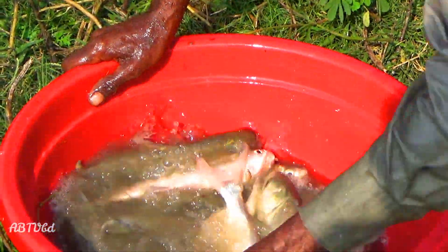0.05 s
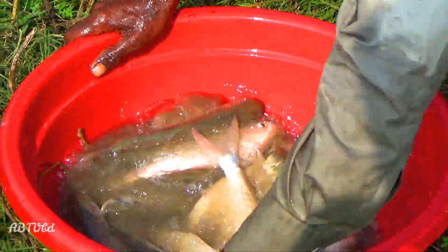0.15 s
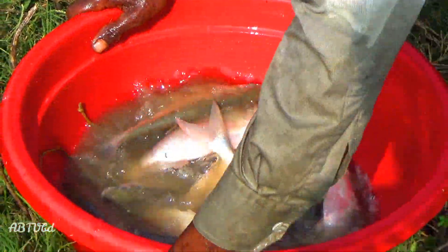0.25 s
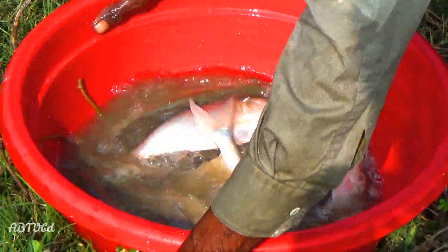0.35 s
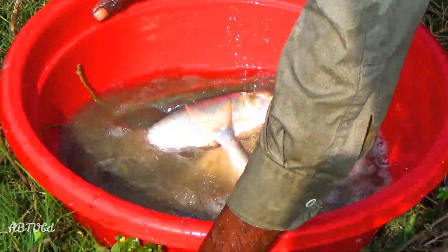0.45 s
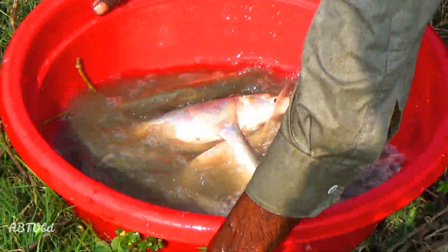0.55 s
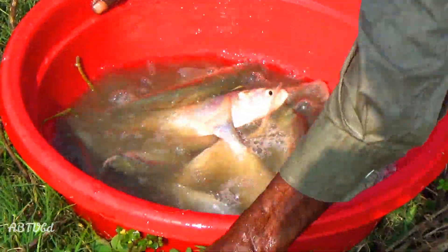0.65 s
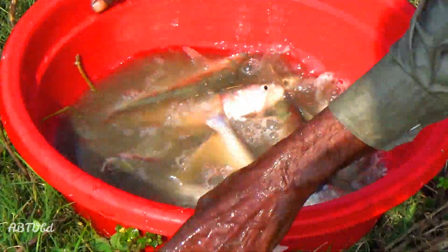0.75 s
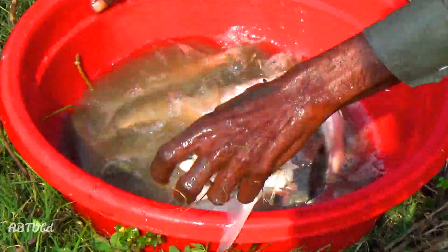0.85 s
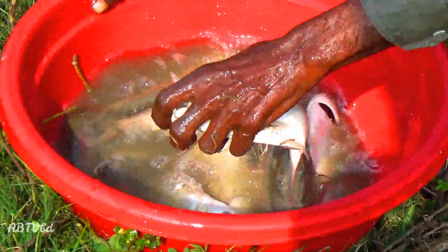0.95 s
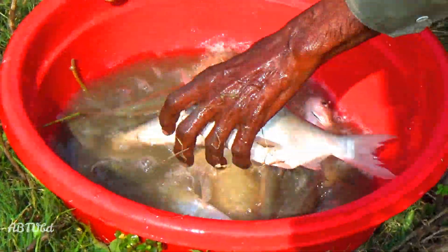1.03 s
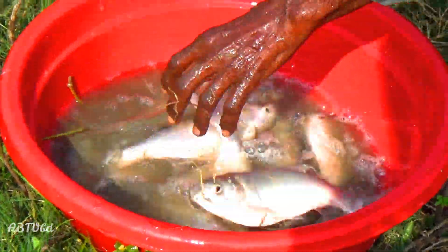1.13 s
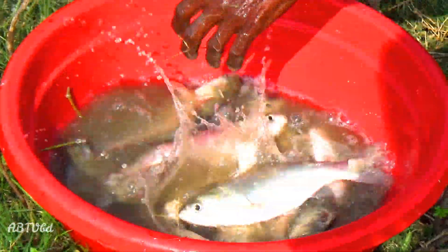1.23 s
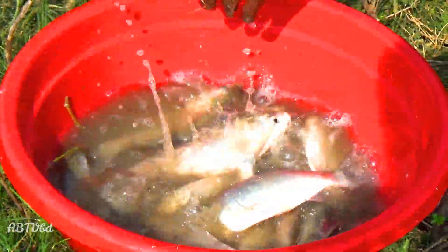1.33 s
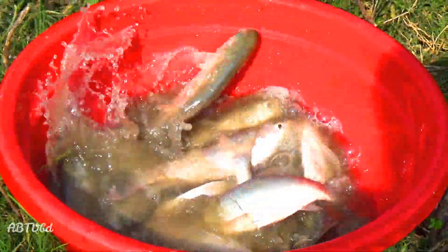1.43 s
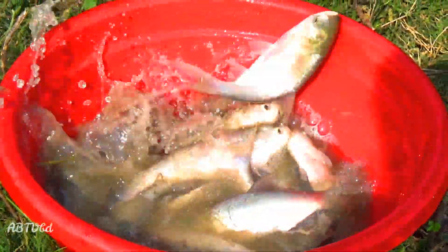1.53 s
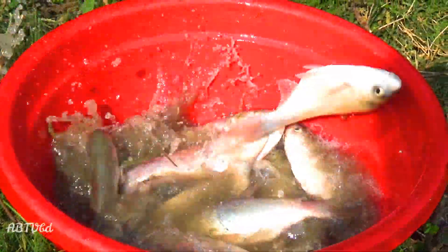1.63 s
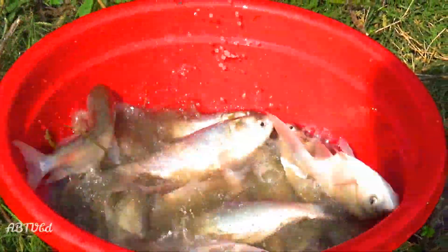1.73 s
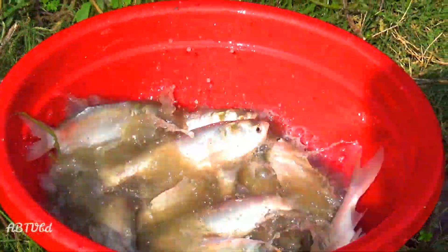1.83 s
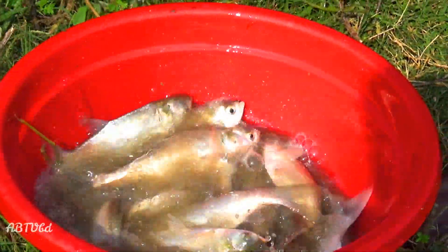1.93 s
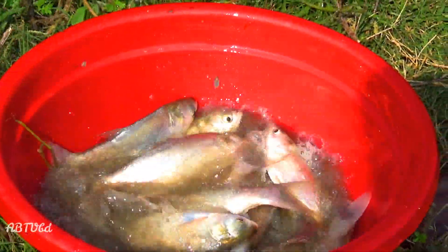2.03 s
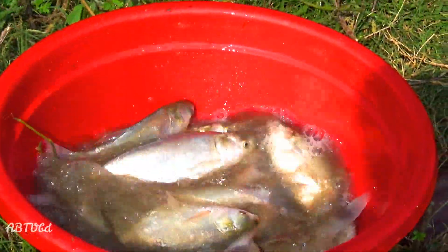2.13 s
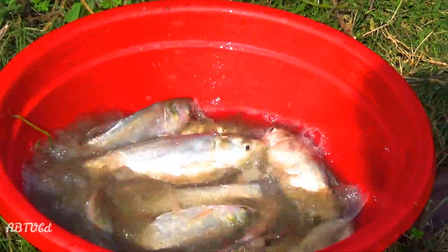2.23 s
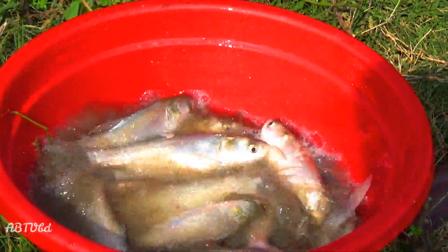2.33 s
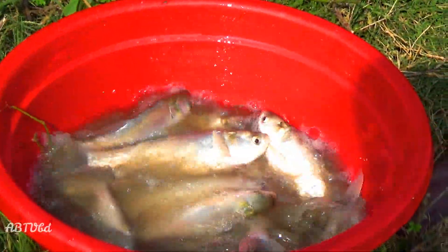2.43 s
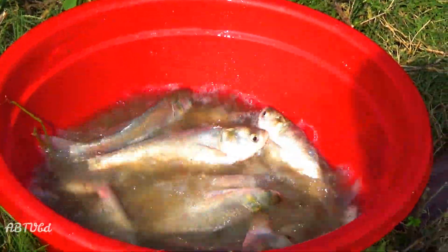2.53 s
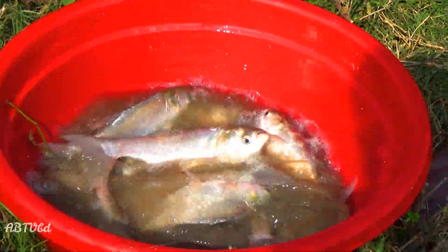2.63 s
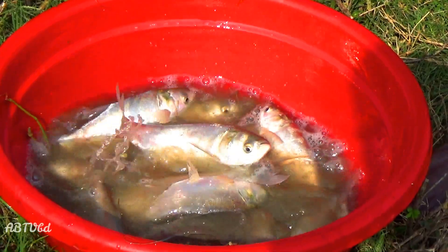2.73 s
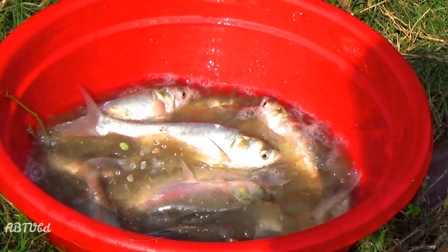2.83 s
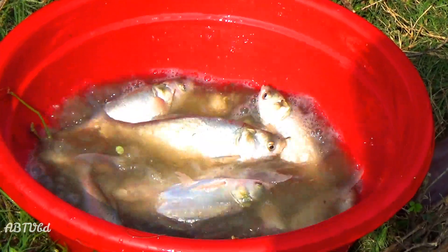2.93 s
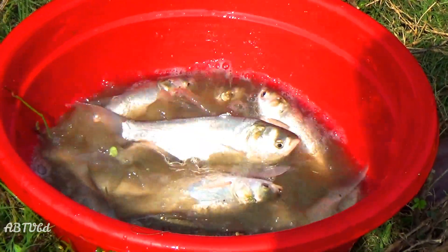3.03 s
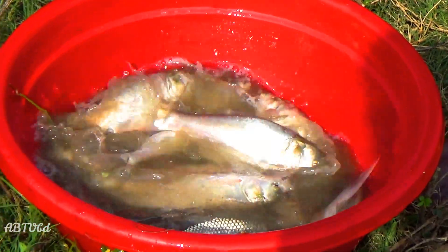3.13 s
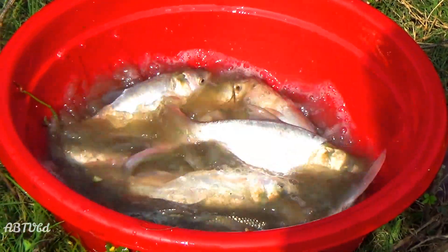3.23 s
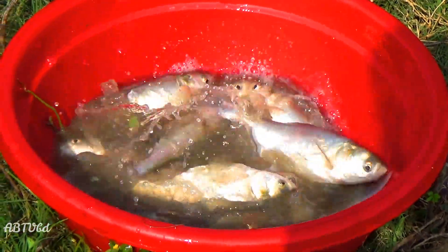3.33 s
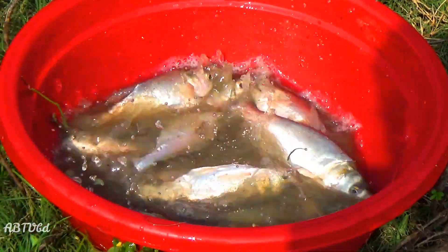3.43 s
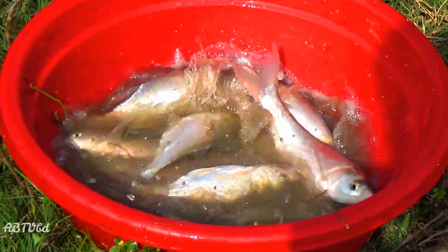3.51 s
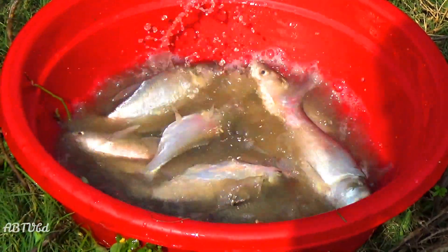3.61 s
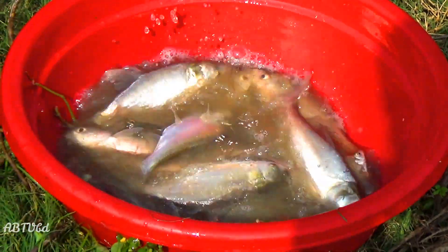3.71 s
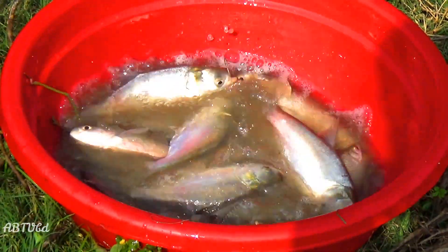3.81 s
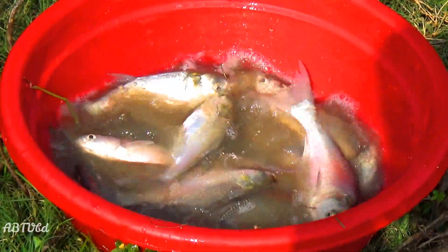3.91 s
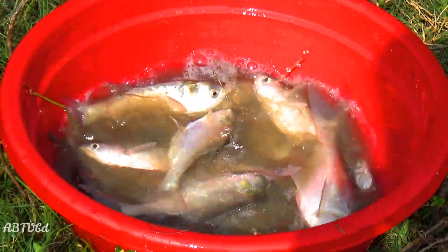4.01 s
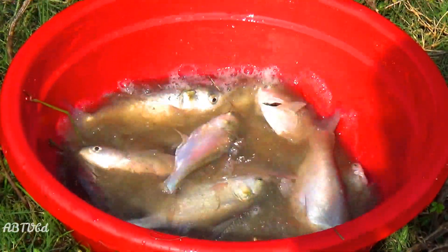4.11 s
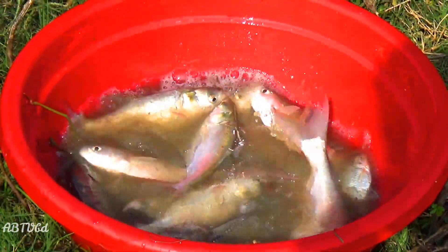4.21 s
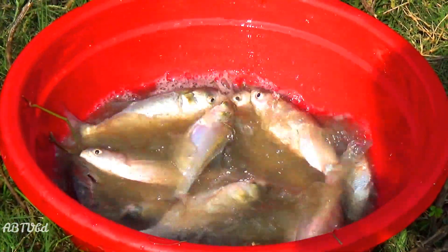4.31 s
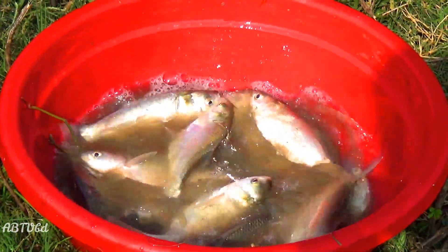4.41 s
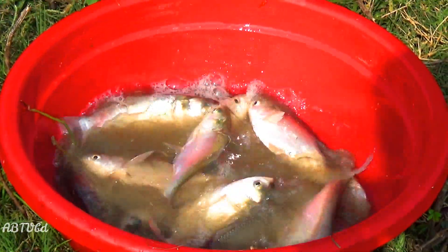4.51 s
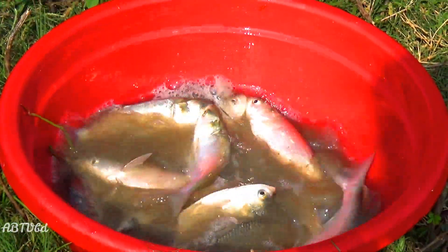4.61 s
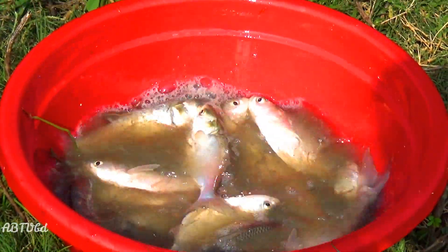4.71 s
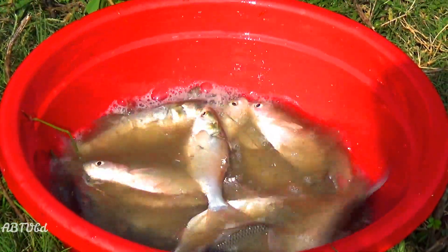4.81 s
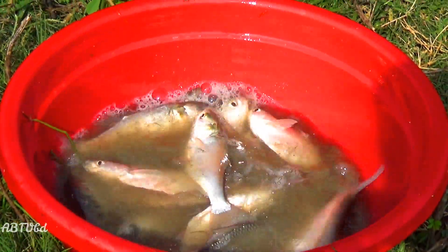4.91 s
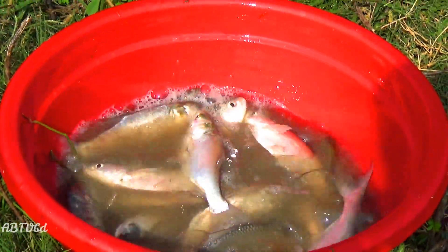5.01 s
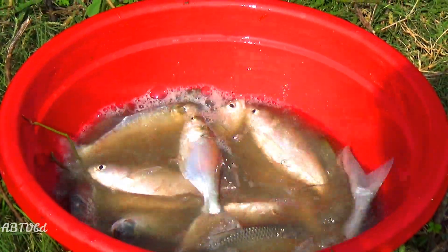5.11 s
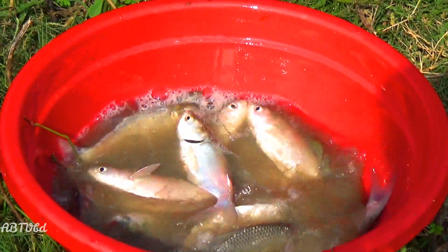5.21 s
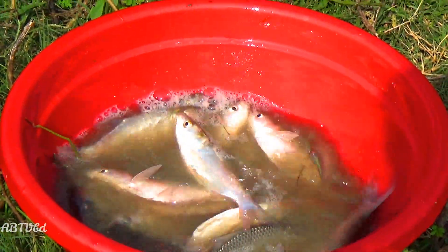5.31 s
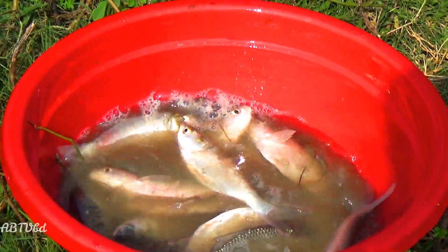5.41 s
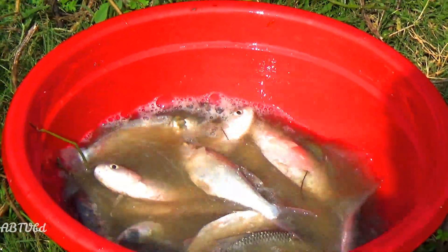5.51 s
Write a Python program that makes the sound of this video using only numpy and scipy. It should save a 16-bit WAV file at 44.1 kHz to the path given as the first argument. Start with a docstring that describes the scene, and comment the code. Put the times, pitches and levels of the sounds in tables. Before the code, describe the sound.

Close stereo pickup of fish in a shallow plastic basin outdoors. A hand stirs the water with soft fizz and small plops, then a hard slap just after one second leads into a violent thrashing burst of spray and slosh until about 1.9 seconds. Sparse drops tick afterwards, then shorter flurries of slaps and crackling droplets return. Low wind rumbles and thumps on the microphone over a faint open-air hush.

```python
"""Wind rumbles and thumps on a stereo microphone over a soft outdoor hush: shaped noise and short pulses.
In a shallow plastic basin, stirred by a hand for the first second, fish thrash: spray patters, foam
fizzes and water sloshes (noise and random bursts), trapped air rings and two low thumps sound (short sines).
Flung drops and tail slaps add noise cracks and resonant plops; the basin wall smears all the water."""
import sys
import numpy as np
from scipy import signal
from scipy.fft import rfft, irfft
from scipy.io import wavfile
from scipy.ndimage import uniform_filter1d

SR = 44100
rng = np.random.default_rng(int(sys.argv[2]) if len(sys.argv) > 2 else 0)


def generate_wav(sig):
    """Save sig (samples, or channels by samples) to the path in sys.argv[1] as 16-bit PCM at SR."""
    pcm = np.round(np.clip(np.atleast_2d(sig).T, -1, 1) * 32767).astype(np.int16)
    wavfile.write(sys.argv[1], SR, pcm)


def voltage_ratio(level):
    """Linear amplitude factor for a level in decibels (scalar or array-like)."""
    return 10 ** (np.asarray(level, float) / 20)


N = 244965
TIME = np.arange(N) / SR
LEFT_RIGHT = np.array([[1.], [-1.]])


def colour(x, points, turn=1):
    """Shapes x to a (Hz, dB) spectrum at rms 1; turn rotates the phase."""
    hz, db = np.transpose(points)
    f = np.fft.rfftfreq(x.shape[-1], 1 / SR) + 1  # + 1 avoids log 0
    gain = voltage_ratio(np.interp(np.log(f), np.log(hz), db))
    y = irfft(rfft(x) * turn * gain, x.shape[-1])
    return y / np.sqrt(np.mean(y ** 2))


def band(x, lo_hz, hi_hz):
    """Butterworth band-pass."""
    return signal.sosfilt(signal.butter(N=2, Wn=[lo_hz, hi_hz], btype="band", fs=SR, output="sos"), x)


def curves(table):
    """Table columns interpolated at every sample."""
    s, *columns = np.transpose(table)
    return [np.interp(TIME, s, c) for c in columns]


def walk(rate_hz):
    """Random levels, one per 1 / rate_hz, joined by straight slews; spread near 1.3."""
    k = int(SR / rate_hz)
    held = np.repeat(rng.standard_normal(N // k + 1), k)
    return 1.57 * uniform_filter1d(held, k)[:N]


def place(sounds, start_s, pan_db):
    """Adds each row of sounds at its start, left over right by pan_db."""
    out = np.zeros((2, N + sounds.shape[1]))
    for sound, s, db in zip(sounds, start_s, pan_db):
        i = max(int(s * SR), 0)
        out[:, i:i + len(sound)] += sound * voltage_ratio(LEFT_RIGHT * db / 2)
    return out[:, :N]


# Wind level before buffeting. Each row: time in seconds, rumble in dB, upper rumble relative to it in dB.
WIND_LEVELS = [(0.0, -32, -4), (0.11, -32.5, 1), (0.61, -26.5, -16), (1.09, -32, -6.5), (1.76, -27, -9.5),
               (2.3, -31, -5), (2.49, -27, -10.5), (2.56, -36.5, -6), (2.72, -39, -11), (2.9, -41.5, -18),
               (3.08, -33.5, -13), (3.3, -26.5, -13.5), (3.66, -40, -17), (3.86, -35.5, -16),
               (4.27, -44, -25), (4.58, -41, -3.5), (4.98, -36, -28), (5.55, -41, -33)]
# Rumble spectrum common to both capsules. Each row: frequency in Hz, relative density in dB per Hz.
RUMBLE_SPECTRUM = [(12, -46), (20, -14), (59, 0), (102, -1.5), (137, -6), (256, -21), (420, -36),
                   (550, -41), (920, -120)]
# Rumble spectrum of the left-right difference. Each row: frequency in Hz, relative density in dB per Hz.
RUMBLE_SIDE_SPECTRUM = [(12, -44), (20, -19), (65, -3.5), (141, -2), (394, -23), (905, -36.5), (1400, -42),
                        (3300, -120)]


def wind():
    """Turbulence on two close capsules: shared bass, plus a side part partly a quarter cycle behind it."""
    low_db, upper_db = curves(WIND_LEVELS)
    shared, own = rng.standard_normal((2, N))
    lagging = colour(shared, RUMBLE_SIDE_SPECTRUM, turn=-1j)
    side = 0.77 * lagging + 0.46 * colour(own, RUMBLE_SIDE_SPECTRUM)
    pair = colour(shared, RUMBLE_SPECTRUM) + LEFT_RIGHT * voltage_ratio(-5.5) * side
    low = signal.sosfilt(signal.butter(N=1, Wn=120, fs=SR, output="sos"), pair)
    # eddies buffet the capsules, and shake the upper rumble most
    buffet = np.exp(0.5 * np.tanh(walk(30)))
    upper = voltage_ratio(upper_db + 6.0 + 1.8 * buffet) * (pair - low)
    rumble = voltage_ratio(low_db + 1.77 * buffet) * (low + upper)
    return rumble + eddy_thumps()


# Thumping eddies. Each row: centre in seconds, peak in dB.
WIND_EDDIES = [(0.057, -17), (0.072, -18), (0.17, -17.5), (0.848, -21.5), (0.887, -19), (1.789, -15),
               (1.963, -19.5), (2.114, -19.5), (2.29, -22), (2.428, -24.5)]


def eddy_thumps():
    """Each passing eddy is one pressure pulse with a dip on either side."""
    width_s = 0.0023
    thumps = np.zeros(N)
    for s, db in WIND_EDDIES:
        age = ((TIME - s) / width_s) ** 2
        thumps += voltage_ratio(db) * (1 - 2 * age) * np.exp(-age)
    return thumps


# Hush spectrum common to both sides. Each row: frequency in Hz, relative density in dB per Hz.
HUSH_SPECTRUM = [(120, -36), (200, 5), (269, -3), (441, -5), (502, -8.5), (905, -6), (1090, -13),
                 (1630, -18), (2270, -20), (3670, -26), (9730, -24), (15100, -31), (16300, -36)]
# Hush spectrum of the left-right difference. Each row: frequency in Hz, relative density in dB per Hz.
HUSH_SIDE_SPECTRUM = [(120, -32), (200, -4), (2000, -12), (3470, -23), (4250, -23), (7950, -24),
                      (11900, -38), (16300, -73)]


def hush():
    """Far outdoor hush: steady noise, with an independent side part that widens it."""
    mid_db, side_db = -50, -56.5
    mid, side = rng.standard_normal((2, N))
    wide = LEFT_RIGHT * voltage_ratio(side_db) * colour(side, HUSH_SIDE_SPECTRUM)
    return voltage_ratio(mid_db) * colour(mid, HUSH_SPECTRUM) + wide


# Stirring between splashes. Each row: time in seconds, spray in dB, slosh in dB.
STIR_LEVELS = [(0.0, -42, -44.5), (0.22, -41, -52), (0.5, -50, -58.5), (0.6, -42.5, -59),
               (0.64, -46.5, -58), (0.72, -46.5, -51.5), (0.8, -51, -55), (0.83, -53.5, -55),
               (0.92, -56, -60.5), (1.14, -53, -50.5), (1.34, -40, -47.5), (1.46, -34.5, -30),
               (1.75, -30, -37), (1.86, -31, -38), (1.89, -37, -41.5), (1.96, -42.5, -49), (2.37, -49, -54),
               (2.79, -50, -56), (2.92, -41.5, -54.5), (3.06, -40, -53.5), (3.35, -43, -51),
               (3.5, -35.5, -47), (3.74, -48.5, -54.5), (4.11, -45, -53.5), (4.33, -41, -53),
               (4.65, -44.5, -55.5), (4.74, -45, -49.5), (5.14, -49.5, -52), (5.38, -49, -55),
               (5.55, -38, -49.5)]
# Splashes, brief surges of the stirring. Each row: peak time in seconds, spray in dB, slosh in dB.
SPLASH_SURGES = [(0.058, -35, -44), (0.228, -46, -60), (0.33, -38.5, -52), (1.099, -49.5, -43.5),
                 (1.195, -26.5, -33), (1.445, -25, -35), (1.48, -28, -30.5), (1.508, -21.5, -27),
                 (1.562, -22, -24), (1.624, -23.5, -32), (1.67, -36, -45), (1.71, -30.5, -32.5),
                 (1.799, -28, -25), (1.868, -46, -43), (3.21, -54, -43.5), (3.306, -36, -43),
                 (3.381, -30.5, -39.5), (3.44, -37, -37.5), (3.516, -40, -42), (3.78, -46, -45),
                 (3.85, -37.5, -50), (4.056, -31.5, -55), (4.18, -30, -50), (4.68, -44, -47),
                 (5.05, -41, -53), (5.21, -36.5, -45), (5.512, -39, -49)]


def stirring():
    """Spray and slosh level in dB: steady stirring plus, in power, splashes that rise faster than they fall."""
    rise_db_per_s, fall_db_per_s = 486, 314
    s, *peaks_db = np.transpose(SPLASH_SURGES)[:, :, None]
    coarse_s = TIME[::64]
    late_s = coarse_s - s
    slope_db = np.where(late_s < 0, rise_db_per_s * late_s, -fall_db_per_s * late_s)
    levels_db = []
    for steady_db, peak_db in zip(curves(STIR_LEVELS), peaks_db):
        power = np.sum(voltage_ratio(peak_db + slope_db) ** 2, axis=0)
        surge = np.interp(TIME, coarse_s, power)
        levels_db.append(10 * np.log10(voltage_ratio(steady_db) ** 2 + surge))
    return levels_db


def patter(per_s, spread_db, tail_ms):
    """Droplets at random moments, a few far bigger than the rest, each a decaying noise burst."""
    hits = rng.random(N) < per_s / SR
    size = hits * voltage_ratio(spread_db * np.minimum(rng.exponential(size=N), 3.3))
    bursts = signal.lfilter([1], [1, -np.exp(-1000 / SR / tail_ms)], size)
    return bursts * rng.standard_normal(N)


# Spray spectrum. Each row: frequency in Hz, relative density in dB per Hz.
SPRAY_SPECTRUM = [(1470, -36), (2500, 0.5), (3140, -7.5), (4000, -0.5), (4830, 1.5), (5740, -2.5),
                  (9190, 1), (11400, -5), (14700, -25), (16300, -61)]
# Slosh spectrum. Each row: frequency in Hz, relative density in dB per Hz.
SLOSH_SPECTRUM = [(260, -4.5), (450, -1.5), (523, -7), (705, 0.5), (834, -8), (1970, 1), (3650, -4),
                  (4200, -42), (9240, -120)]


def churn(spray_db, slosh_db):
    """Spray patters and foam fizzes in the treble, water sloshes below; patter and slosh clump together."""
    hand_out_s = 1
    clumps = 1.3 * np.tanh(walk(45))
    # while a hand stirs the water, fizz gains and patter loses
    hand_db = np.where(TIME < hand_out_s, 3.0, 0)
    # fine drops tick high, fat ones lower
    fine = band(patter(600, 4.24, 1.0), 5400, 22000)
    fat = band(patter(300, 8.4, 0.35), 1900, 8400)
    spray = colour(fine + 0.55 * fat, SPRAY_SPECTRUM) * voltage_ratio(-5.0 - hand_db + 3.5 * clumps)
    foam = colour(band(rng.standard_normal(N), 7500, 22000), SPRAY_SPECTRUM)
    fizz = foam * voltage_ratio(-9.5 + hand_db + 2.0 * walk(70))
    lumpy = colour(patter(600, 4.1, 3.6), SLOSH_SPECTRUM)
    smooth = colour(rng.standard_normal(N), SLOSH_SPECTRUM)
    slosh = voltage_ratio(-4.5) * lumpy + voltage_ratio(-12.0) * smooth
    return voltage_ratio(spray_db) * (spray + fizz) + voltage_ratio(slosh_db + 3.43 * clumps) * slosh


def ring_out(db, hz, ms, rise):
    """A sine that swells fast, climbs in pitch, as an air pocket does nearing the surface, and dies."""
    t = np.arange(1280) / SR
    age = t * 1000 / ms
    shape = (1 - np.exp(-age / 0.02)) * np.exp(-age ** 2.6 / 1.76)
    return voltage_ratio(db) * shape * np.sin(2 * np.pi * hz * t * (1 + rise * (age - 1) / 2))


# Clear air pockets, and two short low thumps near 1.71 and 1.79 s.
# Each row: start in seconds, level in dB, pitch at half length in Hz, length in ms.
POCKETS_AND_THUMPS = [(0.008, -38, 1900, 3.4), (0.035, -40, 1290, 7.9), (0.069, -30.5, 846, 4.4),
                      (0.123, -39, 1480, 5.9), (0.135, -33, 5400, 2.5), (0.153, -22, 1394, 8.9),
                      (0.226, -35, 990, 8.9), (0.228, -30, 2210, 5.2), (0.358, -31.5, 970, 2.3),
                      (0.388, -39, 610, 3.5), (0.69, -42, 820, 3.9), (0.805, -31.5, 1350, 1.8),
                      (1.097, -36.5, 750, 11), (1.244, -37.5, 810, 8.6), (1.442, -29.5, 795, 6.4),
                      (1.479, -26.5, 1186, 12), (1.48, -19.5, 688, 8.2), (1.499, -24, 1890, 3.7),
                      (1.516, -24, 705, 4.7), (1.552, -24, 1106, 9.1), (1.668, -28.5, 2100, 7.7),
                      (1.699, -34, 1960, 12), (1.707, -21, 380, 4.2), (1.728, -26, 760, 3.4),
                      (1.784, -26, 865, 2.9), (1.79, -22, 287, 3.7), (1.812, -27.5, 1283, 8.4),
                      (1.904, -42, 2050, 3), (1.973, -40, 1400, 3.3), (1.985, -36, 2900, 2.8),
                      (1.991, -41, 1830, 6), (2.043, -39, 1300, 3.1), (2.085, -40, 2780, 5.4),
                      (2.138, -35, 1930, 2.3), (2.142, -33, 2350, 5.8), (2.437, -41.5, 2600, 2.6),
                      (2.519, -42, 810, 5.4), (2.752, -37, 3180, 3.1), (2.949, -36, 854, 3),
                      (3.428, -28, 1430, 4.4), (3.438, -30.5, 623, 6.3), (3.129, -35, 2490, 2.1),
                      (3.3253, -36, 2500, 5), (3.373, -33, 1000, 2.2), (3.762, -34.5, 860, 3.8),
                      (3.772, -31, 1610, 4.7), (3.782, -30.5, 2080, 4.3), (3.786, -41, 2720, 5.4),
                      (3.839, -36.5, 1966, 11), (4.038, -34.5, 1170, 3.4), (4.316, -35, 4990, 3),
                      (4.32, -44, 2860, 7.2), (4.333, -34, 4410, 3.4), (4.336, -41, 3150, 3),
                      (4.348, -30, 4540, 2), (4.4958, -32, 2600, 1.6), (4.6574, -34, 2380, 1.9),
                      (4.682, -39, 1850, 2.8), (4.747, -41, 2900, 3), (4.753, -43, 1980, 4),
                      (4.79, -42, 1350, 4), (4.8558, -39.5, 2880, 3.6), (4.9711, -39, 3660, 3.5),
                      (4.981, -36.5, 478, 13), (5.05, -34.5, 1230, 11.5), (5.058, -34, 715, 2.9),
                      (5.107, -37.5, 5130, 3.8), (5.279, -32.5, 1260, 4.2), (5.5, -21, 3150, 5.6),
                      (5.532, -40, 1250, 5.2), (5.512, -43.5, 1215, 13), (5.514, -34.5, 2130, 3.6)]


def bubbles(slosh_db):
    """Clear air pockets and two short low thumps, and a crowd of small bubbles that follows the slosh."""
    s, db, hz, ms = np.transpose(POCKETS_AND_THUMPS)[:, :, None]
    single = place(ring_out(db, hz, ms, rise=0.034), s[:, 0], 6.3 * rng.standard_normal(len(s)))
    when, pitch, size, side, cycles = rng.random(size=(3000, 5)).T[:, :, None]
    start_s = when * N / SR
    hz = 900 * 6.5 ** pitch ** 0.7
    ms = (2500 + 4500 * cycles) / hz  # 2.5 to 7 cycles long
    level_db = np.interp(start_s, TIME, np.minimum(slosh_db, -36.0))
    db = level_db - 5.0 - 10.56 * np.log10(size + 0.034)  # few loud, many faint
    return single + place(ring_out(db, hz, ms, rise=0.13), start_s[:, 0], 7.9 * (side[:, 0] - 0.5))


def resonance(f, centre_hz, q):
    """Response of a simple resonator, 1 at its centre."""
    return 1 / (1 + 1j * q * (f / centre_hz - centre_hz / f))


def unit_peak(x):
    """Each row scaled to peak 1."""
    return x / np.abs(x).max(axis=1, keepdims=True)


# Flung drops that land. Each row: time in seconds, crack peak in dB, crack centre in Hz.
FLUNG_DROPS = [(0.033, -17, 10100), (0.205, -19.5, 7500), (0.543, -26, 7500), (0.695, -28, 9600),
               (1.182, -7.5, 10400), (1.2395, -14.5, 9700), (1.3945, -11.5, 9500), (2.1825, -16.5, 8400),
               (2.218, -9, 8900), (2.2856, -19, 7300), (2.3016, -22, 8000), (2.335, -20, 8300),
               (2.3387, -15.5, 5800), (2.437, -19, 9000), (2.461, -25, 8840), (2.5288, -15, 8300),
               (2.539, -19.5, 5630), (2.683, -22, 6500), (2.9046, -15, 7800), (3.0435, -17, 8100),
               (3.0527, -15, 8300), (3.169, -19, 8650), (3.189, -21, 9300), (3.241, -17, 5900),
               (3.3666, -16, 6800), (3.38, -17, 8700), (3.41, -11, 8700), (3.4724, -15.5, 9000),
               (3.504, -18.5, 9500), (3.57, -14.5, 8500), (3.672, -20, 9900), (3.8136, -24, 5100),
               (3.8276, -17, 9700), (3.9664, -15, 9000), (3.977, -12, 7900), (4.011, -21, 8000),
               (4.0174, -11, 8550), (4.0348, -7.5, 8000), (4.048, -2.5, 7800), (4.054, -13, 8400),
               (4.071, -17, 8500), (4.0767, -11, 8200), (4.0891, -7, 8400), (4.108, -23, 7000),
               (4.1165, -18, 8400), (4.129, -14, 8500), (4.134, -16, 7800), (4.141, -6.5, 8350),
               (4.1596, -9.5, 9000), (4.18, -7, 8500), (4.1997, -13.5, 7100), (4.281, -16, 8700),
               (4.287, -14.5, 8050), (4.347, -25, 4640), (4.4197, -17.5, 8150), (4.477, -22.5, 4860),
               (4.5364, -20, 8000), (4.715, -17.5, 7260), (4.7327, -18, 10300), (4.9443, -20.5, 7900),
               (4.9838, -22, 7600), (5.066, -18.5, 9800), (5.18, -5, 9800), (5.182, -9.5, 8900),
               (5.199, -15.5, 8900), (5.2034, -10.5, 9000), (5.2184, -21, 9800), (5.224, -10.5, 9800),
               (5.4465, -29, 6500), (5.457, -24, 7040), (5.4642, -22, 7000), (5.485, -29, 7000),
               (5.4945, -12, 9100), (5.515, -13.5, 4550), (5.538, -15, 8700), (5.5464, -8.5, 8550)]
# Tail slaps. Each row: time in seconds, crack peak in dB, crack centre in Hz, plop peak in dB, plop pitch in Hz.
TAIL_SLAPS = [(0.1934, -24, 4300, -16, 3520), (0.225, -25, 5150, -14.5, 1270),
              (0.3565, -21, 7360, -19, 2070), (0.8056, -28, 6170, -28, 1310),
              (0.8543, -28.5, 4700, -31.5, 2090), (1.0994, -44, 5400, -22, 2250),
              (1.1722, -37, 7660, -40, 2550), (1.1874, -7, 7600, -10.5, 2020),
              (1.2936, -18, 5060, -23.5, 2450), (1.3897, -13.5, 6700, -19, 2760),
              (1.399, -27, 4400, -13.5, 2700), (1.437, -14, 8250, -20, 1500),
              (1.4732, -24, 7300, -32, 2200), (1.5096, -3.5, 10200, -12, 2600),
              (1.5144, -14, 4970, -14, 1970), (1.5177, -15, 5970, -19, 1440),
              (1.5594, -8, 11800, -22, 2150), (1.6052, -2, 9650, -16, 2000), (1.6113, -18, 8300, -15, 2040),
              (1.6162, -3, 8900, -14, 2350), (1.6676, -8.5, 6660, -28, 1850),
              (1.6802, -10, 6360, -28, 2260), (1.7787, -10, 8200, -22, 2800),
              (1.7869, -16, 9000, -28, 1160), (1.798, -18, 5900, -21, 2470),
              (1.8097, -8.5, 4200, -21, 2770), (1.8359, -13, 6400, -21, 2680),
              (1.8655, -5, 7650, -15.5, 970), (3.1377, -8.5, 10000, -35, 2590),
              (3.201, -22, 9100, -21.5, 2600), (3.2101, -36, 4840, -17, 3060),
              (3.2146, -9, 8100, -20.5, 2260), (3.3044, -29, 8100, -21.5, 2680),
              (3.3235, -33, 8200, -21, 2300), (3.3724, -1.5, 9300, -23.5, 2110),
              (3.4128, -14, 6300, -22, 2300), (3.4282, -16, 7950, -18, 1690), (3.512, -18, 9700, -24, 2170),
              (3.5227, -24, 9500, -14, 2410), (3.6023, -17, 6800, -25.5, 2680),
              (3.6063, -15, 5100, -29, 2640), (3.641, -22.5, 6540, -28.5, 3460),
              (3.6974, -17.5, 6400, -26, 3140), (3.8556, -22, 6100, -21.5, 2420),
              (3.9482, -16, 6700, -24.5, 2790), (4.1701, -6.5, 6600, -28, 3400),
              (4.3163, -10, 9900, -33.5, 2720), (4.5925, -17.5, 6640, -34.5, 1390),
              (4.6685, -10.5, 8300, -32, 3080), (5.0441, -14.5, 5800, -23, 1600),
              (5.2798, -20, 3760, -25, 2400), (5.4997, -5.5, 5770, -29, 3260),
              (5.5099, -14, 6600, -14, 3730)]


def slaps(spray_db):
    """Drops and slaps: a faint lead-in, a sharp crack round its own pitch, a crackly tail, a duller plop."""
    drop_plop_db, drop_plop_hz = -34, 2600  # plop relative to the drop's crack
    rows = TAIL_SLAPS + [(s, db, hz, db + drop_plop_db, drop_plop_hz) for s, db, hz in FLUNG_DROPS]
    s, crack_db, crack_hz, plop_db, plop_hz = np.transpose(rows)[:, :, None]
    lead = 192  # samples before the blow
    t = (np.arange(1024) - lead) / SR
    after = np.maximum(t, 0)
    f = np.fft.rfftfreq(len(t), 1 / SR) + 1
    chance = rng.standard_normal((len(rows), 3, len(t)))

    # in churning water a blow drags more spray before and after it
    drag = np.sqrt(voltage_ratio(np.minimum(0.91 * (np.interp(s, TIME, spray_db) + 24.0), 0)))
    lead_in = voltage_ratio(-14.0) * drag * np.exp(t / 0.0015)
    tail = voltage_ratio(-13.5) * drag * np.exp(-after / 0.0062)
    shape = np.where(t < 0, lead_in, np.exp(-after / 0.0004) + tail)
    # the water thrown up slaps back a moment later
    back = t - 0.0012 - 0.0012 * np.abs(chance[:, 1, :1])
    shape = shape + voltage_ratio(-10.5) * (back > 0) * np.exp(-np.abs(back) / 0.00033)
    crackle = chance[:, 0] * voltage_ratio(7.6 * uniform_filter1d(chance[:, 1], size=12))
    shade_hz, shade_db = np.transpose(SPRAY_SPECTRUM)
    shade = voltage_ratio(np.interp(np.log(f), np.log(shade_hz), shade_db) * 0.53)
    crack = irfft(rfft(crackle * shape) * resonance(f, crack_hz, 1.23) ** 2 * shade)

    # the cavity that the blow punches in the water rings at its own pitch
    fall = np.exp(-after / 0.00081) + voltage_ratio(-4.5) * np.exp(-after / 0.0042)
    thud = np.where(t < 0, np.exp(t / 0.00029), fall)
    push = chance[:, 2] * thud * 0.26 + (t == 0)
    plop = irfft(rfft(push) * (resonance(f, plop_hz, 8.1) + 0.16 * resonance(f, 1150, 1.0)))

    blows = voltage_ratio(crack_db) * unit_peak(crack) + voltage_ratio(plop_db) * unit_peak(plop)
    return place(blows, s[:, 0] - lead / SR, 0.41 + 1.6 * chance[:, 2, 0])


def basin(x, t60_s, wet_db):
    """The plastic wall sends back a short smear, different at each capsule."""
    t = np.arange(2048) / SR
    tail = rng.standard_normal((2, len(t))) * np.exp(-np.log(1000) * t / t60_s) * (t > 0.001)
    tail = band(tail / np.sqrt(np.sum(tail ** 2, axis=1, keepdims=True)), 270, 8500)
    return x + voltage_ratio(wet_db) * signal.fftconvolve(x, tail, axes=1)[:, :N]


def scene():
    """Wind and hush over the water in its basin."""
    air = wind() + hush()
    spray_db, slosh_db = stirring()
    water = churn(spray_db, slosh_db) + bubbles(slosh_db) + slaps(spray_db)
    return air + basin(water, t60_s=0.012, wet_db=-14.0)


def band_limit(x):
    """A steep low-pass at the top of the band."""
    return signal.sosfilt(signal.butter(12, 16500, fs=SR, output="sos"), x)


def record(dry):
    """Soft saturation rounds the sharpest peaks."""
    mix = np.tanh(1.197 * dry) / 1.408
    return band_limit(mix)


dry = scene()
out = record(dry)
generate_wav(out)
```